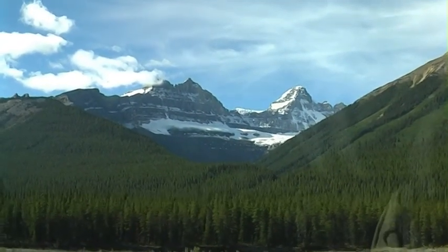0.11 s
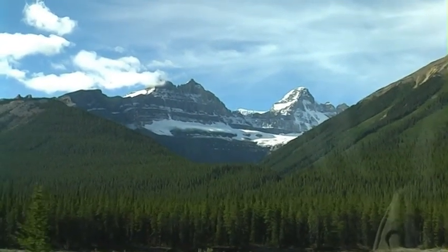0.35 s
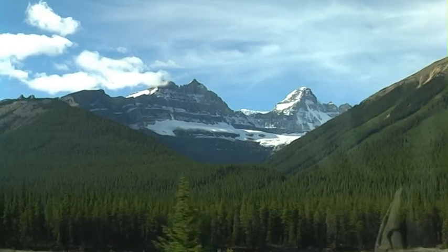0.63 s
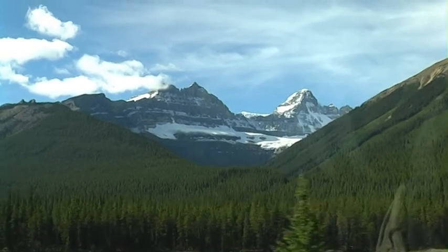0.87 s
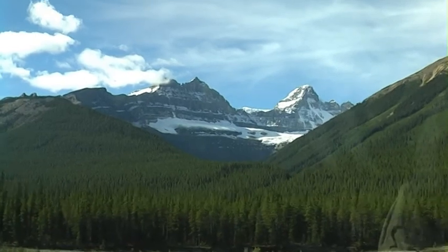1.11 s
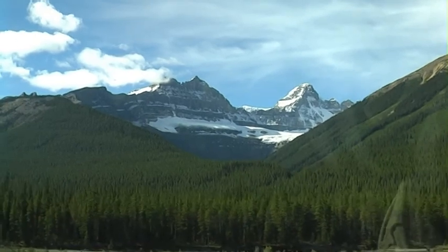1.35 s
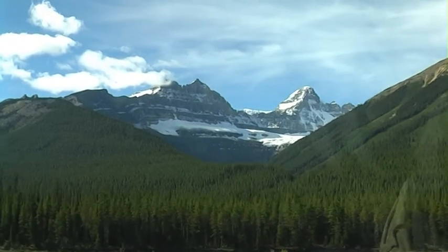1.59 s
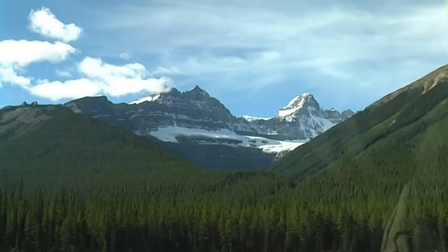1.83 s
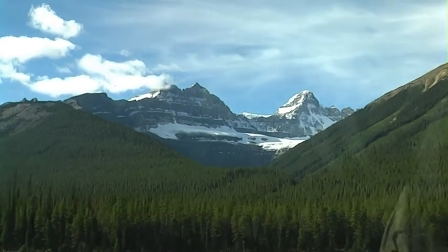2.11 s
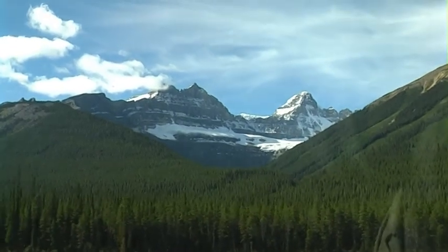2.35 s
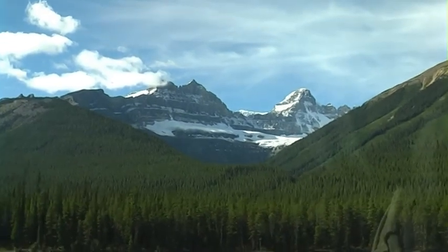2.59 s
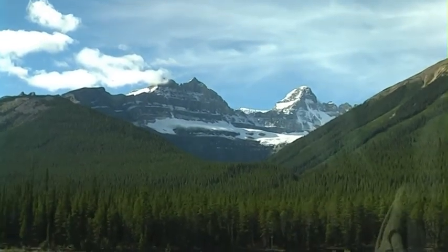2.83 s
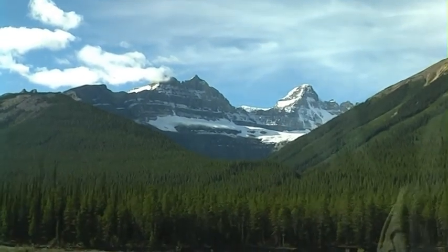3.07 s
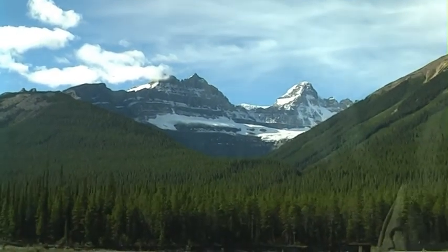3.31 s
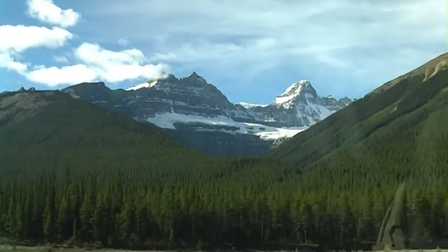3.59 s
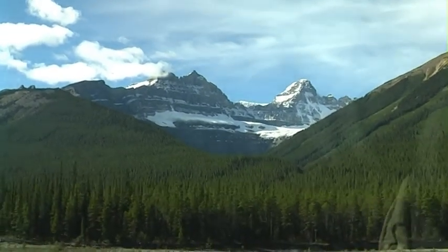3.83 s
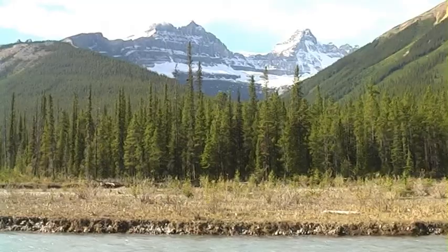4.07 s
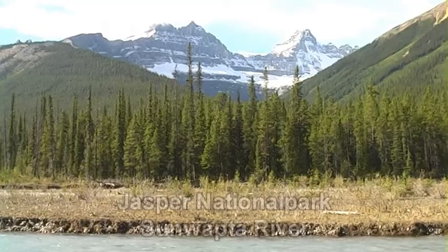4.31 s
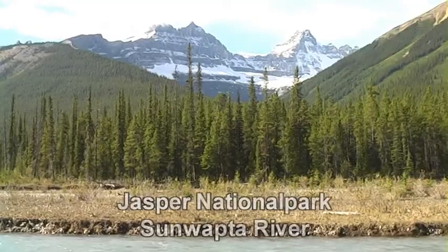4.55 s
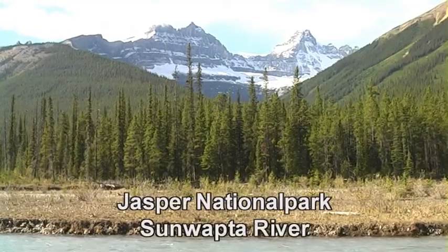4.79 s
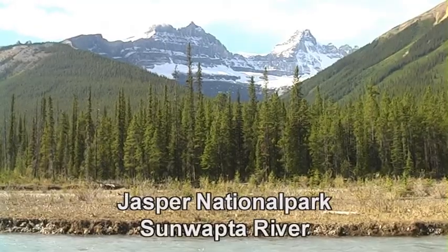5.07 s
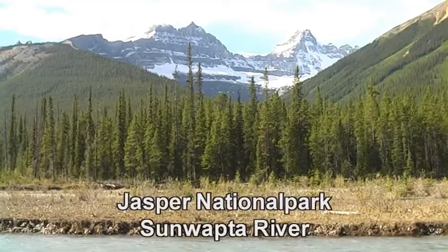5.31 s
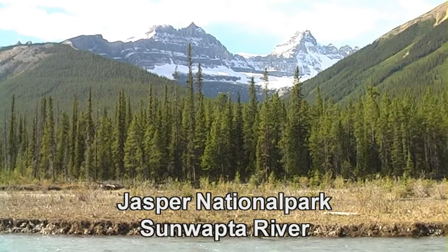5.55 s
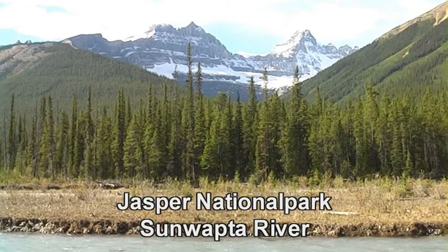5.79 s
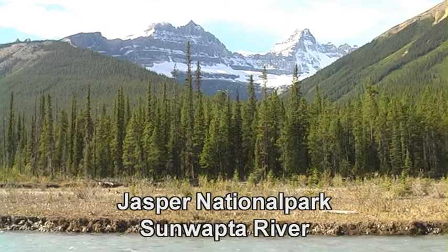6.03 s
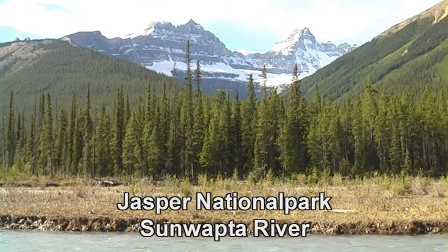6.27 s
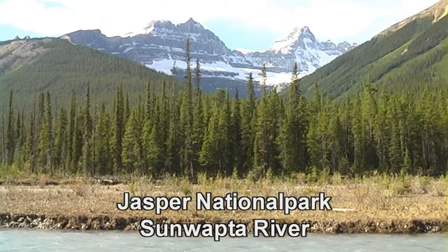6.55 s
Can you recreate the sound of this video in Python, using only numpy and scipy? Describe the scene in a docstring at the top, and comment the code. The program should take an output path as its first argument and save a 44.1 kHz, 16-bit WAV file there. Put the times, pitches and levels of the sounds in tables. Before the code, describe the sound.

From 0 to about 4 seconds we are inside a car on tarmac: a deep, boomy drone with muffled rumble and very little hiss, slowly weakening as the car slows. Soft low thuds from road joints come irregularly, a marked one near 0.3 and a brief rougher patch around 0.9. A turn indicator ticks from the start, dry, close and woody-bright, roughly every third of a second, leaning left. A very faint high motor whine stays constant. Tiny trim snaps crackle around 2.2 to 2.35. At 4.04 a hard cut replaces everything with a shallow stony river outdoors, quieter but brighter and wider: an even, lively rush with fine spray. Rounded gurgles stand out near 4.3, 4.7 to 4.9, 5.4 and 5.7 to 6.0; small drops patter throughout. Low wind flutters on the microphone, calmer around 5 to 5.5, gusting near 5.9, until the end at about 6.6.

```python
"""Road noise fills a car rolling on tarmac: coloured noise in layers makes boom, drone, rumble, roar and hiss.
Damped modes give the jolts; pulses through resonators the indicator's ticks; sines a faint motor whine.
A hard cut leads to a shallow stony river: layered noise for the rush, chirped dying sines for gurgles,
short noise bursts for splashes, and low noise nearly opposite in left and right for wind on the ports."""
import sys
import numpy as np
from scipy import signal
from scipy.fft import rfft, irfft, next_fast_len
from scipy.io import wavfile

SR = 44100
rng = np.random.default_rng(int(sys.argv[2]) if len(sys.argv) > 2 else 0)


def digitize_waveform(pressure):
    """Quantize a signal to 16-bit integers and store it at the path in sys.argv[1].

    Rows of a 2-D input are taken as channels; values are limited to [-1, 1].
    """
    field = np.atleast_2d(pressure).T
    bounded = np.clip(field, -1, 1)
    quanta = np.round(bounded * 32767).astype(np.int16)
    wavfile.write(sys.argv[1], SR, quanta)


def boost(x):
    """Linear amplitude factor 10**(x/20) for a level x in decibels (scalar or array-like)."""
    u = np.asarray(x, float) / 20
    return 10 ** u


N = 293706
CUT_S = 4.0415   # the car gives way to the river

# surges of the river: time_s, vigour_db
SURGE = [(4.05, 1.5), (4.25, -.5), (4.6, -0.5), (4.74, 2.5), (4.85, 0), (4.93, 1), (5.2, -0.5), (5.44, 1),
         (5.7, -0.1), (5.95, 1.5), (6.15, -1), (6.66, -2.5)]


def rms_one(x):
    """Normalises the mean power to one."""
    return x / np.sqrt(np.mean(x ** 2) + 1e-20)


def in_time(rows):
    """Linear interpolation turns (time, level) breakpoints into an envelope in dB."""
    time_s, level_db = np.transpose(rows)
    return np.interp(np.arange(N) / SR, time_s, level_db)


def at_hz(points, hz):
    """Interpolates a spectrum along log frequency, so that equal intervals count equally."""
    points = np.array(points)
    return np.interp(np.log(hz), np.log(points[:, 0]), points[:, 1])


def drift(rate_hz):
    """Slow random modulation of rms 1: random points joined by straight lines."""
    points = rng.standard_normal(400)
    return rms_one(np.interp(np.arange(N) * rate_hz / SR, np.arange(400), points))


def band(x, low_hz, high_hz, order=2):
    """Band-pass filtering keeps the energy between two edges."""
    return signal.sosfilt(signal.butter(order, [low_hz, high_hz], "band", fs=SR, output="sos"), x)


def noise_layers(levels_db, edges_hz, spectrum, modes, side, balance, patchy_db, patch_rate_hz):
    """Spectral shaping: stereo noise is coloured, cut into layers, and each layer follows a level and flickers."""
    size = next_fast_len(N)
    hz = np.maximum(np.arange(size // 2 + 1) * SR / size, 1)
    lift_db = sum(db / (1 + (2 * (hz - f) / width) ** 2) for f, width, db in modes)
    mid, wide = rfft(rng.standard_normal((2, size))) * boost(at_hz(spectrum, hz) + lift_db)
    wide = wide * boost(at_hz(side, hz))
    tilt = boost(at_hz(balance, hz) / 2)
    pair = np.array([(mid + wide) * tilt, (mid - wide) / tilt])
    below = [1 / (1 + (hz / edge) ** 24) for edge in edges_hz]   # power kept under each edge
    out = 0
    for level_db, low, high in zip(levels_db, below, below[1:]):
        layer = irfft(pair * np.sqrt(np.maximum(high - low, 0)), size)[:, :N]
        gain = boost(level_db + patchy_db * drift(patch_rate_hz))
        out = out + layer / np.std(layer.mean(axis=0)) * gain
    return out


def road_noise():
    """Broadband excitation coloured by the cabin and panel resonances, tied to the road level."""
    # boom, panel drone, floor rumble, tyre roar, air hiss: level_db, share of road level, rough_patch_lift_db
    ride_layers = [(-31, .7, -0.5), (-30.5, .8, 4), (-33.5, .7, 2), (-42.5, 1.58, -0.1), (-62, .8, 2)]
    # edges between the layers: edge_hz
    ride_edges_hz = [12, 130, 280, 600, 2200, 14000]
    # relative density of the road noise: pitch_hz, density_db
    cabin_spectrum = [(22, -28.5), (42, -5.5), (54, -11), (91, -4.5), (231, 1), (291, -10.5), (488, -15.5),
                      (615, -25), (1030, -23), (1200, -30.5), (1640, -32.5), (2300, -49), (3300, -56.5),
                      (4600, -57), (4900, -62.5), (8000, -63.5), (12200, -68)]
    # cabin and panel resonances: pitch_hz, width_hz, lift_db
    cabin_modes = [(86.3, 19, 10), (100, 5.4, 8.5), (161, 15.4, 9), (216, 20, 5.5), (350, 25.4, 10),
                   (1020, 220, 2.5), (1310, 38, 8), (1603, 110, 4), (1930, 160, 6), (2920, 790, 9),
                   (8700, 250, 3)]
    # stereo width: pitch_hz, side_minus_mid_db
    cabin_side = [(60, -31.5), (140, -22), (320, -20.5), (480, -13), (720, -1), (1000, -11), (1660, -9.5),
                  (3000, -4), (8700, -5.5), (12200, -1.5)]
    # stereo balance: pitch_hz, left_minus_right_db
    cabin_balance = [(60, 0.5), (660, -.5), (1200, 4.5), (2180, 0), (3970, 1.5), (12000, .5)]
    # the car slows: time_s, road_level_db
    speed = [(0.0, 2), (1.2, 1), (2.0, 0), (2.7, -1.5), (3.4, -1), (4.04, -2.5)]
    rough_patch_s, rough_patch_length_s = 0.937, 0.15   # centre and Gaussian half-width
    speed_db = in_time(speed)
    patch = np.exp(-((np.arange(N) / SR - rough_patch_s) / rough_patch_length_s) ** 2)
    levels_db = [db + share * speed_db + lift_db * patch for db, share, lift_db in ride_layers]
    return noise_layers(levels_db, ride_edges_hz, cabin_spectrum, cabin_modes, cabin_side, cabin_balance,
                        patchy_db=0.44, patch_rate_hz=14)


def motor_whine():
    """Steady pure tones, the whine of a small motor near the microphone, stronger on the left."""
    # partials before the stereo gains: pitch_hz, rms_db
    whine_tones = [(4500, -86), (6300, -92), (8700, -89), (9900, -95), (11640, -97)]
    time_s = np.arange(N) / SR
    whine = sum(np.sqrt(2) * boost(db) * np.sin(2 * np.pi * hz * time_s) for hz, db in whine_tones)
    return whine * [[1.3], [.7]]


def ring(clicks, hz, t60_s):
    """Two-pole resonance: a unit click starts a decaying sine of initial height 1."""
    r, w = boost(-60 / (t60_s * SR)), 2 * np.pi * hz / SR
    return signal.lfilter([0, np.sin(w)], [1, -2 * r * np.cos(w), r * r], clicks + 1e-18)


def indicator():
    """Cascaded resonance and early reflections: one pitched pulse per tick, then a brief housing rattle."""
    # a tick arrives direct and off the glass: delay_s, left_db, right_db
    tick_paths = [(0, 2.5, -5), (.0013, -17, -3), (.0024, -2.5, -21), (.0058, -11, -15),
                  (.0075, -12.5, -4.5), (.009, -7.5, -13), (0.01, -11.5, -13.5), (.0152, -13.5, -11),
                  (0.017, -9, -13.5)]
    # resonances of the ticker housing: pitch_hz, width_hz, lift_db
    housing = [(2630, 490, 0.5), (3095, 220, -4), (3950, 700, -5.5), (5350, 920, -10), (6900, 580, -16.5)]
    tick_hz, tick_width_hz = 2700, 820   # of each resonant stage
    tick_db, rattle_db = -29.5, -25      # peak of the pulse; rattle relative to it
    rattle_rise_s, rattle_fade_cycles = 0.00079, 32.0
    # the flasher's timer runs out every tick_steps of its clock and ticks on the next whole step
    first_tick_s, clock_step_s, tick_steps, tick_lead_steps = 0.0533, 0.031255, 10.55, 0.15
    steps = np.ceil(np.arange(13) * tick_steps - tick_lead_steps)
    start_s = first_tick_s + clock_step_s * steps

    pulse = np.zeros((2, N))
    for delay_s, left_db, right_db in tick_paths:
        pulse[:, np.round((start_s + delay_s) * SR).astype(int)] += boost([[left_db], [right_db]])
    t60_s = np.log(1000) / (np.pi * tick_width_hz)
    for _ in range(5):   # five stages: a soft, rounded onset
        pulse = ring(pulse, tick_hz, t60_s)

    age_s = np.arange(SR // 20) / SR
    noise = rng.standard_normal((2, len(age_s)))
    noise = noise + 0.92 * noise.sum(axis=0)   # makes left and right alike
    noise = noise * (1 - np.exp(-(age_s / rattle_rise_s) ** 2))
    rattle = 0
    for hz, width_hz, lift_db in housing:
        fading = noise * np.exp(-age_s * hz / rattle_fade_cycles)   # higher resonances die sooner
        mode = band(fading, hz - width_hz / 2, hz + width_hz / 2)
        rattle = rattle + boost(lift_db) * rms_one(mode)
    starts = np.zeros((1, N))
    starts[0, np.round(start_s * SR).astype(int)] = boost(tick_db + rattle_db)
    rattles = signal.fftconvolve(starts, rattle * [[1.15], [.85]], axes=1)[:, :N]
    return pulse / np.abs(pulse).max() * boost(tick_db) + rattles


def bumps():
    """Modal response: each jolt swells and dies in one low mode of the body."""
    # road joints jolting the body: start_s, level_db, pitch_hz
    jolts = [(0.08, -20.5, 162.5), (0.255, -25, 88), (0.33, -16, 162.4), (0.531, -21.5, 167),
             (0.743, -21, 193), (0.948, -19, 91.6), (1.389, -21.5, 170), (1.561, -21, 92),
             (1.816, -23, 159.5), (2.02, -24, 100), (2.84, -22.5, 103), (3.009, -22.5, 160.6),
             (3.513, -24.5, 96), (3.861, -20.5, 155), (3.99, -24, 122), (4.005, -19.5, 178)]
    out, age_s = np.zeros(N + SR), np.arange(SR // 4) / SR
    swell = age_s / 0.018 * np.exp(1 - age_s / 0.016)
    for start_s, db, hz in jolts:
        start = int(start_s * SR)
        out[start:start + len(age_s)] += boost(db) * swell * np.sin(2 * np.pi * hz * age_s)
    return out[:N]


def bursts(rows, spread, decay_s):
    """Band-limited transients: dying puffs of noise around a pitch, rows of (start s, peak dB, Hz)."""
    out, fade = np.zeros(N + 2000), np.exp(-np.arange(2000) / SR / decay_s)
    for (start_s, db, hz), noise in zip(rows, rng.standard_normal((len(rows), 2000))):
        puff = band(noise * fade, hz / spread, min(hz * spread, 13000))
        start = int(start_s * SR)
        out[start:start + 2000] += boost(db) * puff / np.abs(puff).max()
    return out[:N]


def trim_snaps():
    """Impulsive release: the trim snaps in brief noise bursts around 7800 Hz."""
    # trim snapping: start_s, peak_db
    snaps = [(2.223, -48.5), (2.2538, -56), (2.339, -51)]
    return bursts([(start_s, db, 7800) for start_s, db in snaps], 1.4, 0.0016)


def cabin():
    """Superposition of road noise, jolts, ticks, trim snaps and motor whine."""
    return road_noise() + bumps() + indicator() + trim_snaps() + motor_whine()


def river_rush():
    """Incoherent summation: countless small bubbles fuse into a rush, here noise that follows the surges."""
    # gurgle, rush, spray: level_db, share of vigour
    river_layers = [(-47.5, .6), (-53.5, 1.3), (-60, 1.1)]
    # edges between the layers: edge_hz
    flow_edges_hz = [150, 1300, 3500, 14000]
    # relative density of the rush: pitch_hz, density_db
    river_spectrum = [(100, -30), (150, -9), (400, 2.5), (600, -3), (980, 0.5), (1400, -5.5), (1700, 2.5),
                      (2300, -3.5), (2650, 0), (3300, -13), (4040, -18.5), (8500, -22), (12800, -29.5)]
    # stereo width: pitch_hz, side_minus_mid_db
    river_side = [(150, -13), (660, -8.5), (2180, -6.5), (3970, -7), (7230, -13.5), (13000, 2)]
    # stereo balance: pitch_hz, left_minus_right_db
    river_balance = [(360, -0.5), (890, 0), (2180, 3.5), (7230, .5)]
    vigour_db = in_time(SURGE)
    levels_db = [db + share * vigour_db for db, share in river_layers]
    return noise_layers(levels_db, flow_edges_hz, river_spectrum, [], river_side, river_balance,
                        patchy_db=0.98, patch_rate_hz=49)


def bubble(hz, cycles, rise):
    """Bubble resonance: a dying sine whose pitch climbs as the air bubble nears the surface."""
    turns = np.arange(int(4 * cycles * SR / hz)) * hz / SR
    tone = np.sin(2 * np.pi * turns * (1 + rise * turns / cycles))
    return tone * np.exp(-turns / cycles) * (1 - np.exp(-turns / 1.3))


def scattered(draw, level_db, size_db, low_hz, pitch_ratio):
    """Random events after the cut, of exponential size in dB and evenly spread log pitch."""
    start_s = CUT_S + draw[:, 0] * (N / SR - CUT_S)
    sizes_db = size_db * np.minimum(-np.log(draw[:, 1]), 2.5)
    return np.c_[start_s, level_db + sizes_db, low_hz * pitch_ratio ** draw[:, 2]]


def bubbles(count, low_hz, high_hz, level_db, size_db, cycles, clump):
    """Resonant bubbles: set big ones among random ones that swell with the surges and scatter in stereo."""
    # big bubbles: start_s, level_db, pitch_hz at the start
    gurgles = [(4.082, -47, 864), (4.19, -37, 1080), (4.266, -31, 1100), (4.294, -36, 715),
               (4.708, -30, 720), (4.733, -27, 1090), (4.805, -30.5, 720), (4.907, -32, 830),
               (5.428, -32, 1060), (5.693, -33, 1070), (5.843, -39, 773), (5.865, -33, 1060),
               (5.968, -32, 980), (6.396, -35, 1310)]
    draw = rng.random((count, 4))
    small = scattered(draw, level_db, size_db, low_hz, high_hz / low_hz)
    small[:, 1] += clump * np.interp(small[:, 0], *np.transpose(SURGE))
    sides = np.r_[draw[:, 3] - .5, np.zeros(len(gurgles))]
    out = np.zeros((2, N + SR))
    for (start_s, db, hz), side in zip(np.r_[small, gurgles], sides):
        tone = boost(db) * bubble(hz, cycles, rise=0.026)
        pan = boost(np.array([[1], [-1]]) * (0.3 + 2.3 * side))
        start = int(start_s * SR)
        out[:, start:start + len(tone)] += tone * pan
    return out[:, :N]


def spray(count, level_db, size_db):
    """Impact noise: set splashes among a patter of small random drops, stronger on the left."""
    # drops on stone, before the stereo gains: start_s, peak_db, pitch_hz
    splashes = [(4.1027, -36, 6100), (4.2714, -38, 6200), (4.3901, -35.5, 8600), (4.4759, -38, 5030),
                (4.6993, -40, 9000), (5.0062, -38, 6370), (5.0301, -44, 7570), (5.1683, -43, 8500),
                (5.327, -42, 8700), (5.4385, -38, 8700), (5.463, -45, 7600), (5.513, -47.5, 9060),
                (5.6916, -43, 11500), (6.0336, -38, 10500), (6.0683, -39, 5600), (6.3085, -56, 8350)]
    small = scattered(rng.random((count, 3)), level_db, size_db, 4000, 2.8)
    drops = bursts(splashes, 1.26, 0.0011) + bursts(small, 1.14, 0.0015)
    return drops * [[1.08], [.92]]


def wind():
    """Turbulent pressure: lumpy low noise across the two ports, nearly opposite in left and right."""
    # wind on the ports, before the port gains: time_s, strength_db
    gusts = [(4.05, -45.5), (4.32, -44), (4.64, -43), (4.72, -47.5), (4.8, -43), (4.88, -51), (5.2, -54),
             (5.36, -51), (5.52, -58), (5.6, -47), (5.76, -54.5), (5.88, -37.5), (6.0, -46.5),
             (6.08, -43.5), (6.24, -45), (6.4, -43), (6.66, -47)]
    # single puffs, before the port gains: start_s, peak_db, pitch_hz
    pops = [(5.29, -31, 160), (6.295, -31, 300), (6.39, -40, 350)]
    # flutter level at a middling breeze (before the port gains), and how steeply it grows with the wind
    breeze_db, flutter_db, flutter_follows = -45, -53, 1.2
    low_db = in_time(gusts)
    flutter_level_db = flutter_db + flutter_follows * (low_db - breeze_db)
    white = rng.standard_normal((2, N))
    low, flutter = band(white, 57, 102), band(white[::-1], 140, 260)
    low = low / low.std() * boost(low_db)
    flutter = flutter / flutter.std() * boost(flutter_level_db + 3.1 * drift(30))
    opposed, common = low + flutter
    return boost(-11.0) * common + (opposed + bursts(pops, 1.5, 0.0074)) * [[.9], [-1.1]]


def river():
    """Superposition of the fused rush, the nearer bubbles that stand out, spray and wind."""
    rush = river_rush()
    near = bubbles(count=500, low_hz=446.3, high_hz=3175, level_db=-46.5, size_db=4.5, cycles=3.95, clump=1.2)
    return rush + near + spray(count=600, level_db=-57, size_db=4.5) + wind()


def low_passed(sound, top_hz):
    """Steep elliptic low-pass: little remains above the top edge."""
    return signal.sosfilt(signal.ellip(14, .5, 60, top_hz, fs=SR, output="sos"), sound)


def scene():
    """Band-limiting and a crossfade of 0.59 ms: the cabin, then the river, each with its own top edge."""
    after = np.clip((np.arange(N) / SR - CUT_S) / 0.00059, 0, 1)
    inside = low_passed(cabin(), top_hz=12040)
    outside = low_passed(river(), top_hz=12760)
    return inside * (1 - after) + outside * after


def roll_off(x):
    """The treble ends steeply here."""
    return signal.sosfilt(signal.butter(12, 13770, fs=SR, output="sos"), x)


def record(dry):
    """Comb-like notch filtering: narrow dips at evenly spaced pitches, the even ones deeper."""
    dip_spacing_hz, dip_width_hz = 300, 18.2   # width: Gaussian half-width
    dip_even, dip_odd, dip_odd_top_hz = 0.74, 0.57, 5330   # depths as a share of amplitude
    size = next_fast_len(N + SR // 4)
    hz = np.arange(size // 2 + 1) * SR / size
    nearest = np.round(hz / dip_spacing_hz)
    depth = np.where(nearest % 2 == 0, dip_even, dip_odd * (hz < dip_odd_top_hz))
    depth = depth * (nearest > 1)   # the first dip is at twice the spacing
    dips = 1 - depth * np.exp(-((hz - nearest * dip_spacing_hz) / dip_width_hz) ** 2)
    mix = irfft(rfft(dry, size) * dips, size)[:, :N]
    return roll_off(mix)


dry = scene()
out = record(dry)
digitize_waveform(out)
```